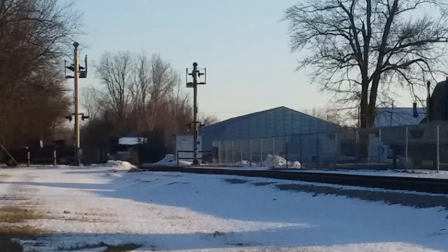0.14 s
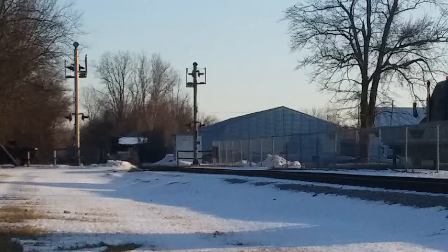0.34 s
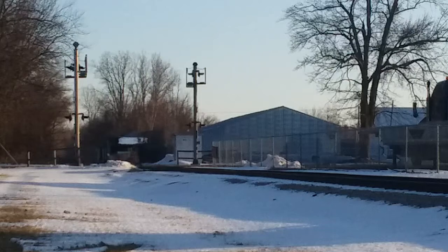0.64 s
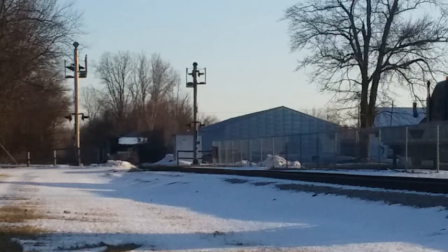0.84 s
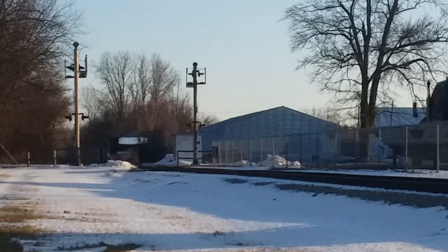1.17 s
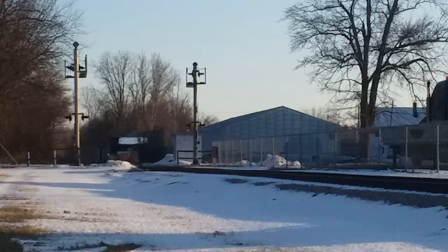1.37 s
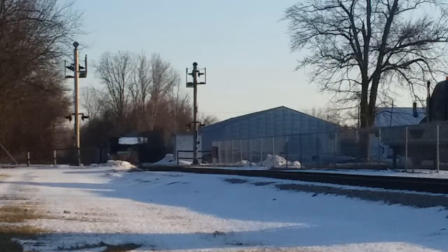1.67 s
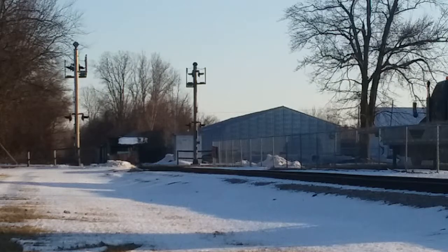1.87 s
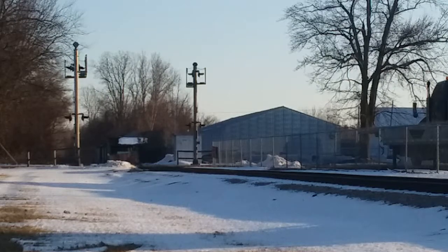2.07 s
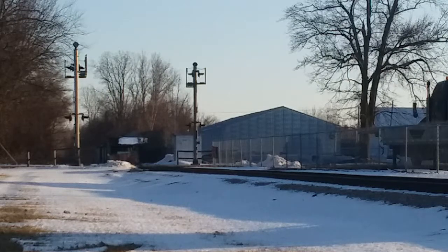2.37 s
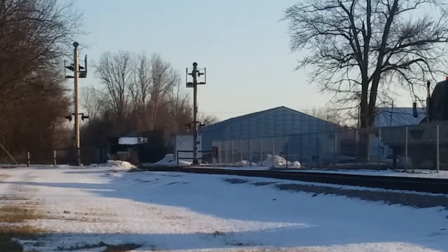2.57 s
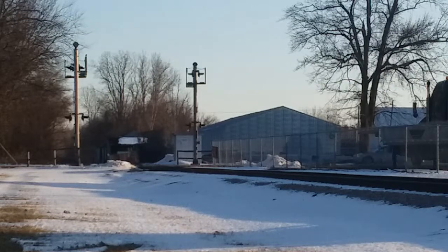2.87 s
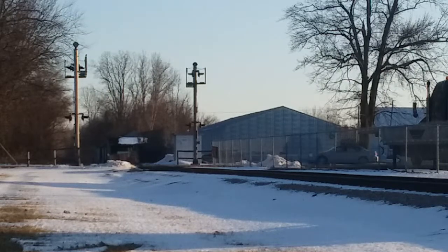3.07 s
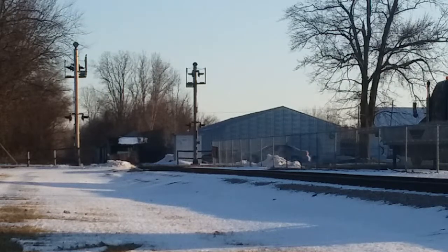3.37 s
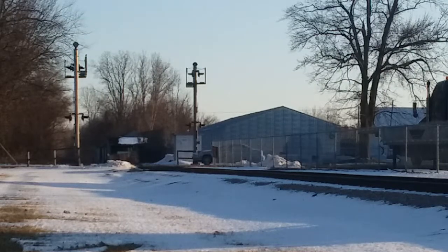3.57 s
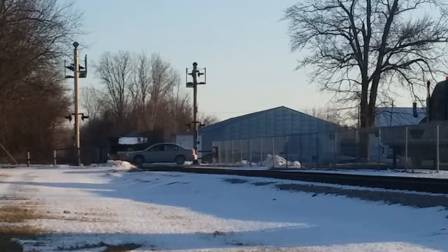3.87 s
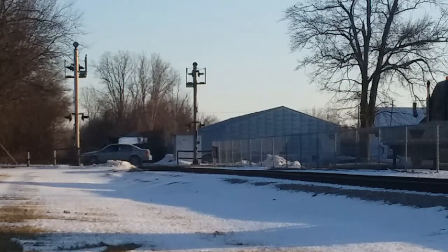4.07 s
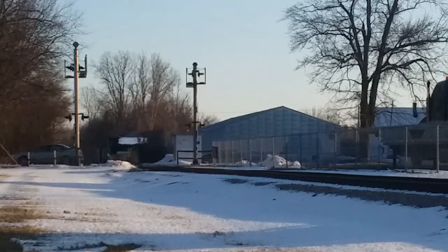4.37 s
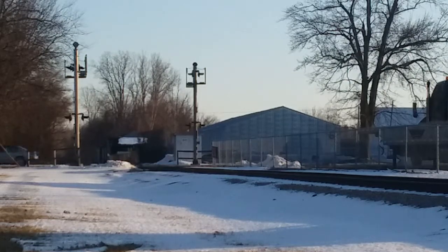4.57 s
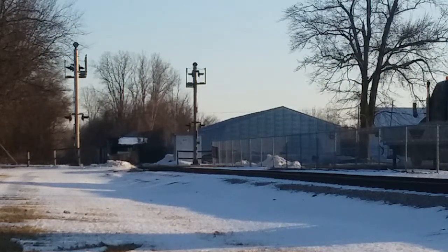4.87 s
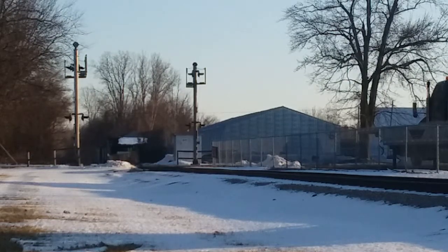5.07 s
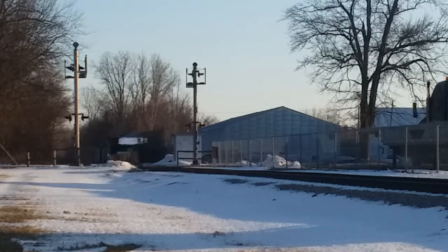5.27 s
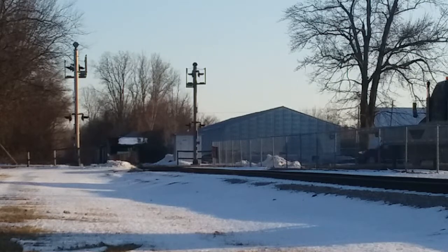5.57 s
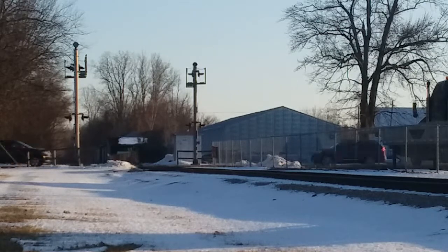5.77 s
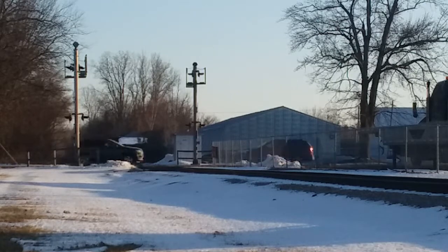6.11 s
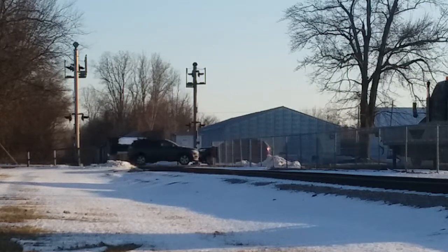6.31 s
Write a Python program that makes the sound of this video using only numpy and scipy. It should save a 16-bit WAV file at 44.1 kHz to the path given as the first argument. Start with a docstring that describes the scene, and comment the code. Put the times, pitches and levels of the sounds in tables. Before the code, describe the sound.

Outdoors, wind buffets the microphone as far cars hum and wash past; a thin squeal comes first, and an engine pulls away at the end.

```python
"""A thin brake squeal and a few small ticks come first, over the drone of an engine, as cars roll
over a snowy level crossing some way off; later the engine pulls away over tyre roar and hiss.
The engine is a sum of harmonics, road and wind are shaped noise, squeals are unsteady thin tones,
and ticks and wind thumps are damped waves. A light wind rumbles and thumps on the microphone,
a little harder on its left port, and a faint steady hiss lies beneath."""
import sys
import numpy as np
from scipy import signal
from scipy.io import wavfile
from scipy.ndimage import uniform_filter1d

SR = 44100
rng = np.random.default_rng(int(sys.argv[2]) if len(sys.argv) > 2 else 0)


def natural_amplitude(level_db):
    """Convert a level in decibels to a linear amplitude factor, elementwise."""
    exponent = np.asarray(level_db, float) / 20
    return 10 ** exponent


def int16_out(signal):
    """Quantize to a 16-bit WAV file."""
    q = np.round(np.clip(np.atleast_2d(signal).T, -1, 1) * 32767)
    wavfile.write(sys.argv[1], SR, q.astype(np.int16))


N = 284123  # samples
SIDE_SIGNS = np.array([[1], [-1]])  # a side signal enters left and right with opposite sign

# Engine speed and strength: t/s, base pitch f/Hz, third-order level/dB
ENGINE_COURSE = [(0.0, 34.22, -34.5), (.5, 34.07, -32.5), (0.879, 32.9, -35), (1.021, 29.46, -31.5),
                 (1.3, 29.63, -27.5), (1.5, 31.07, -33), (1.95, 32.71, -31.5), (2.11, 32.95, -26),
                 (2.27, 33.05, -23.5), (2.501, 32.7, -31.5), (2.67, 33.36, -26), (2.8, 33.96, -24.5),
                 (2.96, 33.96, -25), (3.03, 34, -32), (3.38, 33.33, -29.5), (3.55, 32.86, -22.5),
                 (3.738, 33.33, -32), (3.87, 31.7, -25.5), (4.1, 32.35, -34), (4.351, 36.5, -32),
                 (4.55, 37.14, -32), (5.4, 37.7, -34), (5.951, 38.3, -33), (6.44, 39.8, -33.5)]
# Engine orders when cruising: multiple of the base pitch, level/dB over the third order
CRUISE_ORDERS = [(1, -46.5), (2, -26), (3, 0), (4, -22), (5, -16), (6, -17.5), (7, -28), (8, -31), (9, -28),
                 (10, -31.5), (11, -35), (12, -38), (13, -41), (14, -31)]
# Engine orders when pulling: multiple of the base pitch, level/dB over the third order
PULL_ORDERS = [(1, -26), (2, -1.5), (3, 0), (4, -6), (5, -10), (6, -12), (7, -20), (8, -9), (9, -25),
               (10, -20), (11, -22), (12, -25), (13, -22)]
# Engine load: t/s, load/1 (0 cruising, 1 pulling)
ENGINE_LOAD = [(0, .7), (.6, .5), (1.5, .4), (2.2, 0), (3.7, 0.01), (4.3, 0.65), (4.8, 0.86), (6.44, 1)]
# Brief dips of the booming third order: t/s, depth/dB, length/s
BOOM_DIPS = [(0.064, 25, 0.024), (0.182, 24, 0.03), (.28, 20, .05), (0.433, 20, 0.037),
             (2.183, 21.5, 0.079), (3.521, 9.5, 0.061), (3.63, 18, 0.12), (3.993, 12, 0.13),
             (4.202, 7, 0.045), (4.329, 9, 0.028), (5.42, 6.5, 0.12)]
BOOM_WAVER_DB = 1.5

# Near tyres: t/s, level/dB, side over mid/dB before the spread below is added
NEAR_COURSE = [(0.0, -63.5, -18), (.25, -64.5, -20), (.5, -69.5, -13), (1.199, -65.5, -16),
               (1.5, -69.5, -14.5), (1.75, -70, -23), (2.4, -81, -24), (2.9, -67, -26.5), (3.35, -68, -25),
               (3.5, -62, -26), (4.0, -58.5, -23), (4.5, -56, -21), (5.1, -57, -16.5), (5.75, -58, -14),
               (6.0, -58, -14), (6.44, -56.5, -17.5)]
# Near tyre spectrum: f/Hz, density/dB per Hz over the near level
NEAR_SPECTRUM = [(30, -40.5), (150, -18), (500, -17), (900, -19), (1500, -21), (2100, -26), (2560, -31.5),
                 (3000, -32), (3350, -32.5), (3750, -37), (4290, -42.5), (5500, -46), (7700, -50.5)]
# Spread of the near tyres, bass central: f/Hz, addition to side over mid/dB
NEAR_SPREAD_SPECTRUM = [(300, -13), (900, -2), (1600, -1), (2800, 3.5), (4500, -2), (6000, -6.5),
                        (7500, -4)]
# Passing changes of tyre tone, louder or softer bands in the tyre noise:
# t/s, length/s, level change/dB, f/Hz, half-width/Hz
TONE_CHANGES = [(0.56, 0.72, 4, 6400, 1300), (3.13, .6, 4, 6980, 1290), (3.82, 0.58, 5.5, 6800, 1300),
                (3.89, .9, 3.5, 4730, 930), (5.7, 0.9, 8, 7040, 1300), (5.999, 0.83, 9, 4500, 850),
                (4.1, 1.5, 3, 3350, 220), (4.6, .8, 2.5, 1550, 130), (5.65, .5, 3, 5600, 830),
                (.1, 0.61, 8, 1870, 510), (3.0, .7, 6.5, 1000, 300), (5.9, 0.35, -2, 3740, 1200),
                (4.5, .4, 3.5, 3200, 250), (6.16, .4, 3, 3470, 270)]
# Far wash: t/s, level/dB
FAR_COURSE = [(0, -44), (1.1, -48), (1.7, -46), (3.0, -48.5), (4.2, -49.5), (4.55, -52.5), (5.3, -48.5),
              (6.44, -49.5)]
# Far wash spectrum: f/Hz, density/dB per Hz over the far level
FAR_SPECTRUM = [(18, -49.5), (30, -20), (60, -17), (103, -6), (192, -10.5), (400, -27), (572, -35),
                (792, -32), (1520, -32), (1960, -37.5), (2470, -50), (4000, -63.5), (7700, -73)]
# Spread of the far wash: f/Hz, side over mid/dB
FAR_SPREAD = [(60, -47.5), (300, -36.5), (800, -14), (1500, -14.5), (2100, -16.5), (2800, -26.5),
              (8000, -27.5)]
ROAD_EDGE_HZ = 7850  # the road noise dulls sharply above this

# Short and long bands of noise, rumble, hiss and a faint whine:
# t/s, length/s, level/dB, f/Hz, width/Hz
NOISE_BANDS = [(.121, 1.11, -37, 171, 111), (.251, .121, -66, 3600, 2600),
               (3.821, .101, -76.5, 13600, 4000), (3.972, .101, -71.5, 13600, 4500),
               (5.681, .28, -80.5, 13810, 1600), (5.947, .05, -54, 3900, 1500),
               (5.947, .03, -49, 2760, 200), (5.955, .022, -48.5, 3090, 200), (5.95, .03, -57, 4500, 300),
               (6.031, .28, -78.5, 13810, 1900), (6.2, .6, -79, 11500, 4000), (3.3, 4.0, -84, 4900, 120),
               (5.0, 3.5, -82, 13000, 5000)]

# Brake squeals: start t/s, length/s, level/dB before fading, f/Hz, pitch arch/Hz
BRAKE_SQUEALS = [(.01, .1, -67, 12440, 10), (.09, .57, -58, 12460, 30), (.64, .22, -80, 12465, 5),
                 (.86, .13, -62, 12415, 10), (1.0, .12, -78, 12400, 10), (1.14, .12, -76, 12470, 10),
                 (1.28, .14, -59, 12470, 10), (1.42, .12, -82, 12500, 20), (.39, .36, -65, 11930, 190),
                 (.655, .1, -57, 6495, 10), (.655, .1, -62, 9675, 10)]
SQUEAL_RISE_S, SQUEAL_FADE_DB, CHATTER_DB = 0.039, -12.5, 0.5
SKIRT_DB, SKIRT_PER_S, SQUEAL_WOBBLE_HZ = -9, 500, 25  # fuzz around each squeal; unsteady pitch

# Small dry ticks: t/s, nominal peak level/dB, settled f/Hz, 60 dB decay time/s
DRY_TICKS = [(.0918, -41, 2500, .007), (.1203, -24.5, 1360, .009), (.2205, -35, 2300, .007),
             (.2418, -30, 1870, .014), (5.297, -52, 9000, .002)]

# Gusts over the breeze: t/s, length/s, level/dB before the port offset
WIND_GUSTS = [(0.045, 0.37, -36), (0.955, 0.13, -33.5), (1.317, 0.37, -32.5), (1.749, 0.35, -39.5),
              (2.137, .35, -37), (4.487, 0.084, -40.5), (4.544, 0.37, -40), (5.33, 0.15, -41),
              (6.429, 0.06, -28.5)]
# Wind spectrum, relative only: f/Hz, density/dB per Hz
WIND_SPECTRUM = [(25, -23.5), (45, -12), (80, 1.5), (160, -1), (300, -8.5), (500, -26), (900, -46),
                 (2000, -80.5)]
# Wind thumps: t/s, nominal peak level/dB before softening, settled f/Hz, pitch fall/share of f
WIND_THUMPS = [(0.92, -13, 146, .24), (0.9352, -8.5, 125, 1.83), (.951, -19, 101, .3),
               (1.332, -14, 149, 0.78), (1.339, -2.5, 87, 0.26), (1.3705, -10, 130, 3.43),
               (1.373, -2, 79.5, 0.23), (1.3796, -5, 118.5, 1.3), (1.3899, -10.5, 150, 0.7),
               (1.3948, -5, 187, 0.47), (1.424, -20, 99.2, .22), (5.291, -24, 40.6, 0.48)]
BREEZE_DB, BREEZE_FALL_DB_PER_S = -40.5, 3
THUMP_CYCLES = 4.7  # periods of the settled pitch until a thump has died by 60 dB
LEFT_PORT_DB = 3.4  # left over right

# Microphone hiss spectrum, relative only: f/Hz, density/dB per Hz
HISS_SPECTRUM = [(3530, -27.5), (6000, -5), (6430, -7), (7320, -7), (12200, -4), (13900, -5), (15800, -8.5)]
HISS_DB = -76.5
FADE_IN_S = 0.004


def evened(x):
    """Normalisation: scales a signal to unit rms."""
    return x / np.sqrt(np.mean(x ** 2) + 1e-20)


def read(points, hz):
    """Logarithmic pitch scale: interpolates a spectrum along log frequency."""
    f, value = np.transpose(points)
    return np.interp(np.log(hz + 1), np.log(f + 1), value)


def bell(x, centre, width):
    """Gaussian bump of height 1, with its full width taken at 1/e."""
    return np.exp(-((x - centre) / width * 2) ** 2)


def add(mix, s, sound):
    """Superposition: adds a sound to the mix from s seconds on."""
    part = mix[round(s * SR):][:len(sound)]
    part += sound[:len(part)]


def wander(size, per_s):
    """Random fluctuation: unit-variance random points, per_s a second, joined by straight lines."""
    steps = rng.standard_normal(N // 500)
    return np.interp(np.arange(size) / SR * per_s, np.arange(len(steps)), steps)


def noise(db_field, size=1024):
    """Short-time spectral shaping: random spectra weighted by db_field(t, hz), in dB per Hz."""
    hop = size // 4
    t = np.arange(N // hop + 5) * hop / SR
    hz = np.fft.rfftfreq(size, 1 / SR)[:, None]
    real, imaginary = rng.standard_normal((len(t), len(hz), 2)).T
    spectra = real + 1j * imaginary
    white = signal.istft(spectra, nperseg=size, noverlap=size - hop)[1]
    coloured = signal.istft(spectra * natural_amplitude(db_field(t, hz)), nperseg=size, noverlap=size - hop)[1]
    return coloured[:N] / np.std(white) * np.sqrt(SR / 2)


def ring(db, hz, t60, glide):
    """Damped oscillation: a quick rise, then decay as the pitch falls from near (1 + glide) hz to hz."""
    t = np.arange(SR // 10) / SR
    decay = np.exp(-np.log(1000) * t / t60)
    turns = hz * np.cumsum(1 + glide * decay) / SR
    rise = -np.expm1(-turns / 0.2)
    return natural_amplitude(db) * rise * decay * np.sin(2 * np.pi * turns)


def engine(waver_db=1.6, jitter=.002, smear=.04, high_smear=.25):
    """Harmonic synthesis: orders of the firing cycle, whose balance shifts with load."""
    t = np.arange(N) / SR
    s, hz, db = np.transpose(ENGINE_COURSE)
    turns = np.cumsum(np.interp(t, s, hz) * (1 + jitter * wander(N, 25))) / SR
    load = np.interp(t, *np.transpose(ENGINE_LOAD))
    level_db = np.interp(t, s, db)
    dips_db = sum(depth_db * bell(t, at, length) for at, depth_db, length in BOOM_DIPS)
    boom_db = level_db + BOOM_WAVER_DB * wander(N, 14) - dips_db
    # only the booming third order has the dips; the others waver around a half-second mean
    mean_db = 10 * np.log10(uniform_filter1d(natural_amplitude(level_db) ** 2, SR // 2))
    out = np.zeros(N)
    for (k, cruise_db), (_, pull_db) in zip(CRUISE_ORDERS, PULL_ORDERS):
        order_db = boom_db if k == 3 else mean_db + waver_db * wander(N, 9)
        order_db = order_db + cruise_db + load * (pull_db - cruise_db)
        # uneven firing blurs the high orders
        blur = (high_smear if k > 8 else smear) * np.pi * wander(N, 25)
        out += natural_amplitude(order_db) * np.cos(2 * np.pi * (k * turns + rng.random()) + blur)
    return np.sqrt(2) * out


def road_texture(t, hz, patchy_db=0.9):
    """Spectral irregularity: smoothed random patches in dB, with a steep treble edge."""
    patches = rng.standard_normal((len(t), len(hz))).T
    patches = uniform_filter1d(patches, 12, axis=0)
    patches = evened(uniform_filter1d(patches, 10, axis=1))
    return patchy_db * patches - np.clip((hz - ROAD_EDGE_HZ) / 20, 0, 40)


def near_tyres():
    """Broadband tyre noise: bright hiss of changing width, with passing louder or softer bands."""
    s, near_db, width_db = np.transpose(NEAR_COURSE)

    def mid_field(t, hz):
        tone_db = sum(db * bell(t, at, length) * bell(hz, f, 2 * half_width)
                      for at, length, db, f, half_width in TONE_CHANGES)
        return read(NEAR_SPECTRUM, hz) + np.interp(t, s, near_db) + tone_db + road_texture(t, hz)

    def side_field(t, hz):
        return mid_field(t, hz) + np.interp(t, s, width_db) + read(NEAR_SPREAD_SPECTRUM, hz)

    return noise(mid_field) + SIDE_SIGNS * noise(side_field)


def far_wash():
    """Diffuse sound: distant traffic as duller noise whose width depends on frequency."""
    def mid_field(t, hz):
        return read(FAR_SPECTRUM, hz) + np.interp(t, *np.transpose(FAR_COURSE)) + road_texture(t, hz)

    def side_field(t, hz):
        return mid_field(t, hz) + read(FAR_SPREAD, hz)

    return noise(mid_field, size=2048) + SIDE_SIGNS * noise(side_field, size=2048)


def noise_bands():
    """Band-limited noise: short and long bands, each Gaussian in time and frequency."""
    def field(t, hz):
        power = sum(natural_amplitude(db) ** 2 / width * bell(t, s, length) * bell(hz, f, width)
                    for s, length, db, f, width in NOISE_BANDS)
        return 10 * np.log10(power + 1e-30)

    return noise(field) + natural_amplitude(-17.5) * noise(field) * SIDE_SIGNS


def squeals(fuzz=0.4, fuzz_per_s=110, side=.16):
    """Stick-slip vibration of brake discs: thin chattering tones, slightly different in each ear."""
    out = np.zeros((2, N))
    for s, length, db, hz, arch_hz in BRAKE_SQUEALS:
        t = np.arange(0, length, 1 / SR)
        edges = np.clip(np.minimum(t, length - t) / SQUEAL_RISE_S, 0, 1) ** 2
        fade_db = SQUEAL_FADE_DB * (t / length) ** 3
        level = edges * natural_amplitude(db + fade_db + CHATTER_DB * wander(len(t), 25))
        arch = arch_hz * np.sin(np.pi * (t / length) ** .8)
        pitch = hz + arch + SQUEAL_WOBBLE_HZ * wander(len(t), 15)
        tone = level * np.exp(2j * np.pi * np.cumsum(pitch) / SR)
        # complex random factors broaden the tone into a narrow band
        a, b, c, d = (wander(len(t), fuzz_per_s) for _ in range(4))
        mid = np.sqrt(2 - 2 * fuzz ** 2) + 2.5 * fuzz * (a + 1j * b)
        mid += natural_amplitude(SKIRT_DB) * (wander(len(t), SKIRT_PER_S) + 1j * wander(len(t), SKIRT_PER_S))
        apart = side * (1 + c + 1j * d)
        add(out[0], s, (tone * (mid + apart)).real)
        add(out[1], s, (tone * (mid - apart)).real)
    return out


def ticks():
    """Impulsive excitation: short dry damped waves, each starting slightly sharp."""
    out = np.zeros(N)
    for s, db, hz, t60 in DRY_TICKS:
        add(out, s, ring(db, hz, t60, 0.073))
    return out


def wind(lumpy_db=3, apart_db=-16):
    """Turbulent pressure: lumpy eddy rumble, mostly shared by both microphone ports, and hard thumps."""
    t = np.arange(N) / SR
    breeze_power = natural_amplitude(BREEZE_DB - BREEZE_FALL_DB_PER_S * t) ** 2
    gust_power = sum(natural_amplitude(db) ** 2 * bell(t, s, length) for s, length, db in WIND_GUSTS)
    shared, apart = (evened(noise(lambda t, hz: read(WIND_SPECTRUM, hz) + 0 * t, size=2048))
                     for _ in range(2))
    rumble = shared + natural_amplitude(apart_db) * apart * SIDE_SIGNS
    rumble *= np.sqrt(breeze_power + gust_power) * natural_amplitude(lumpy_db * wander(N, 37))
    thumps = np.zeros(N)
    for s, db, hz, glide in WIND_THUMPS:
        add(thumps, s, ring(db, hz, THUMP_CYCLES / hz, glide))
    # a push of air has no sharp edge
    soft = signal.sosfilt(signal.butter(4, 800, fs=SR, output="sos"), thumps)
    return (rumble + soft) * natural_amplitude(SIDE_SIGNS * LEFT_PORT_DB / 2)


def hiss(side_db=-11):
    """Stationary noise: the faint steady hiss of the microphone pair."""
    mid, side = (evened(noise(lambda t, hz: read(HISS_SPECTRUM, hz) + 0 * t)) for _ in range(2))
    return natural_amplitude(HISS_DB) * (mid + natural_amplitude(side_db) * side * SIDE_SIGNS)


def scene():
    """Linear superposition of all sources."""
    road = near_tyres() + far_wash()
    return engine() + road + noise_bands() + squeals() + ticks() + wind() + hiss()


def top_cut(x):
    """Nothing passes above the cut-off."""
    return signal.sosfilt(signal.butter(12, 15960, fs=SR, output="sos"), x)


def record(dry):
    """High-pass filtering: after a soft start, the microphone cuts the deepest bass."""
    faded = dry * np.minimum(np.arange(N) / SR / FADE_IN_S, 1)
    thin = signal.sosfilt(signal.butter(4, 50, "high", fs=SR, output="sos"), faded)
    return top_cut(thin)


dry = scene()
out = record(dry)
int16_out(out)
```